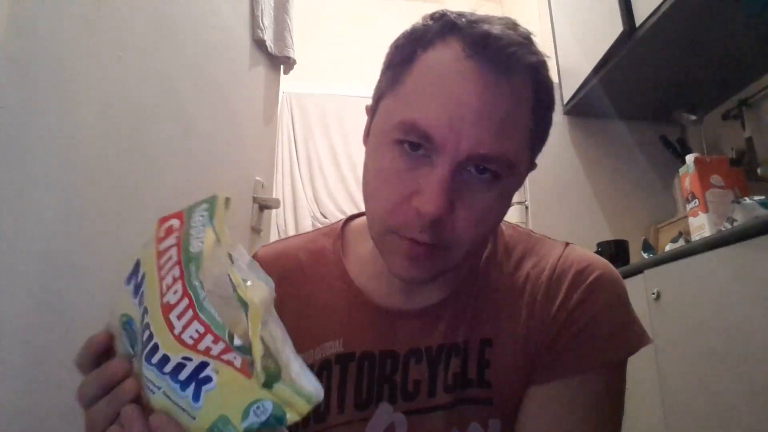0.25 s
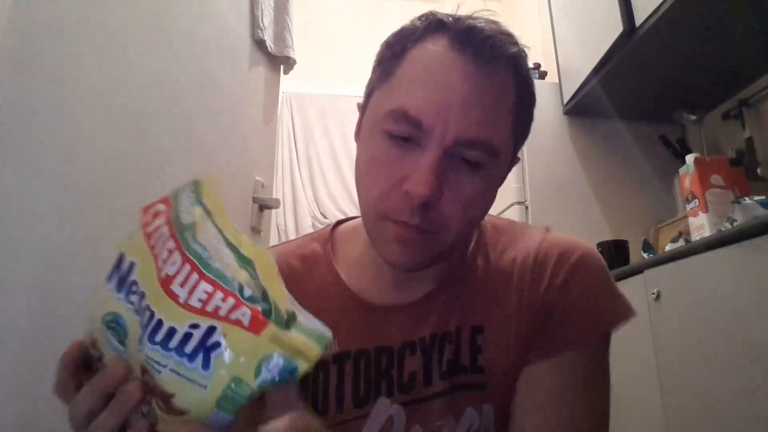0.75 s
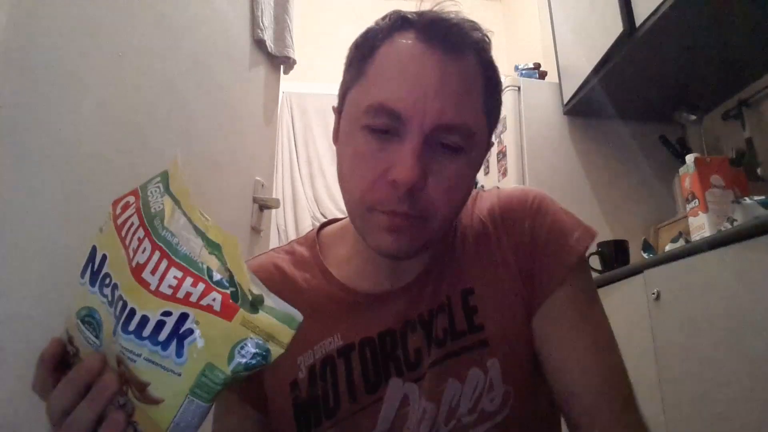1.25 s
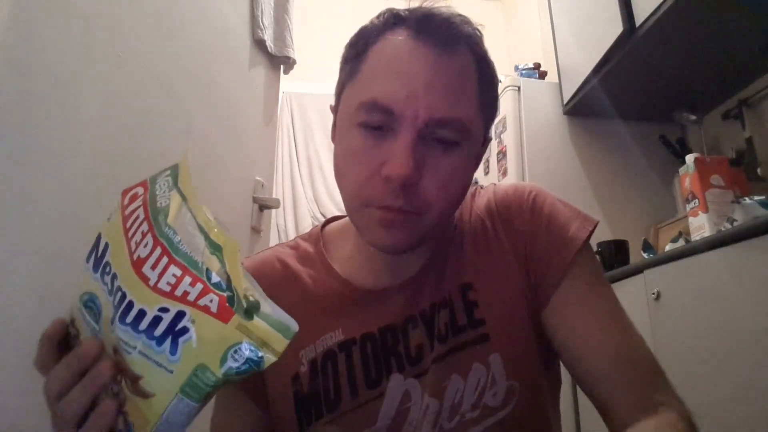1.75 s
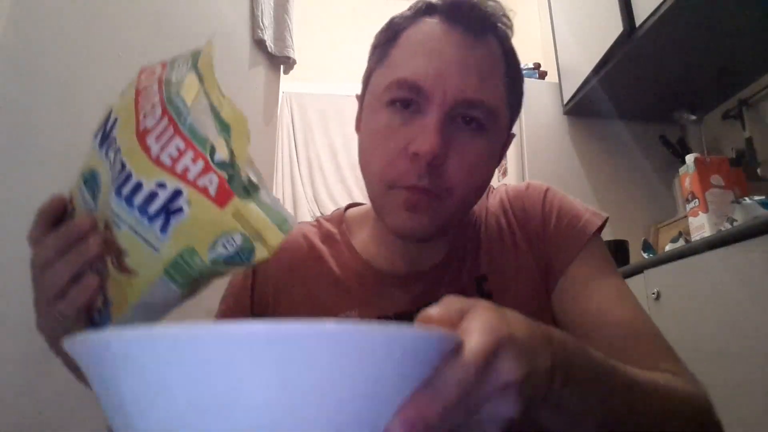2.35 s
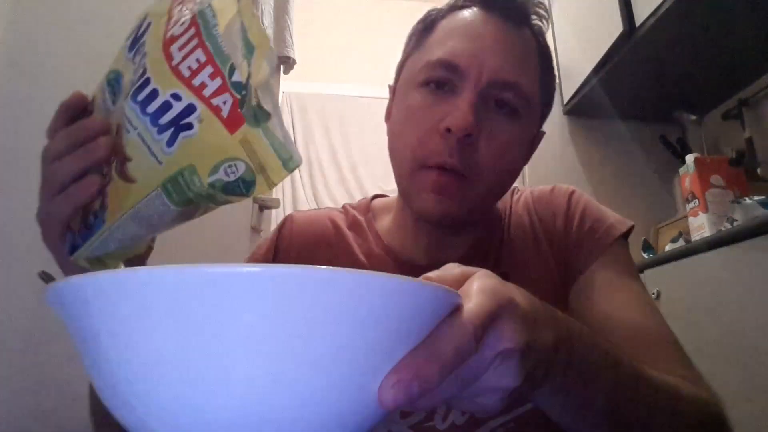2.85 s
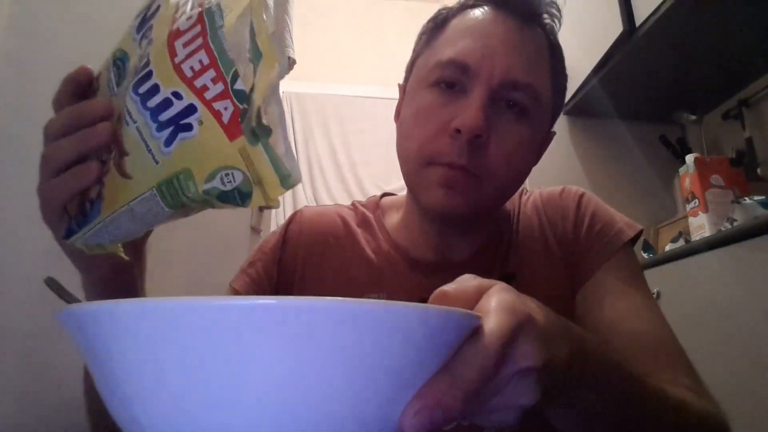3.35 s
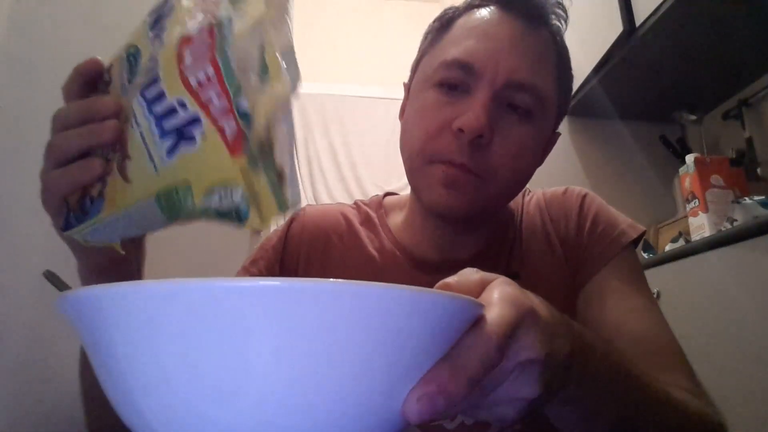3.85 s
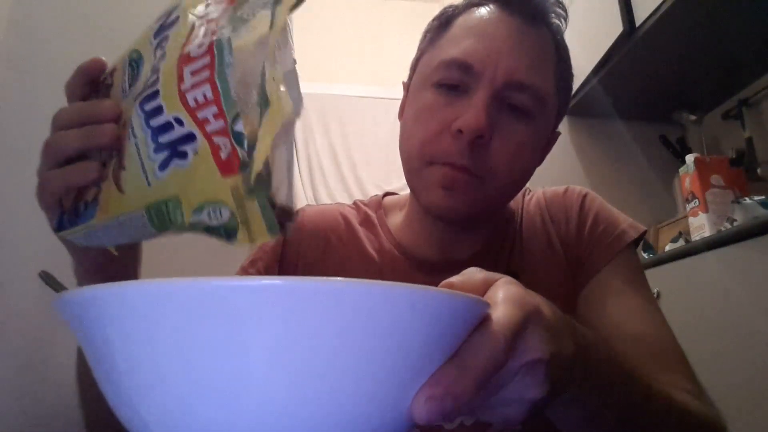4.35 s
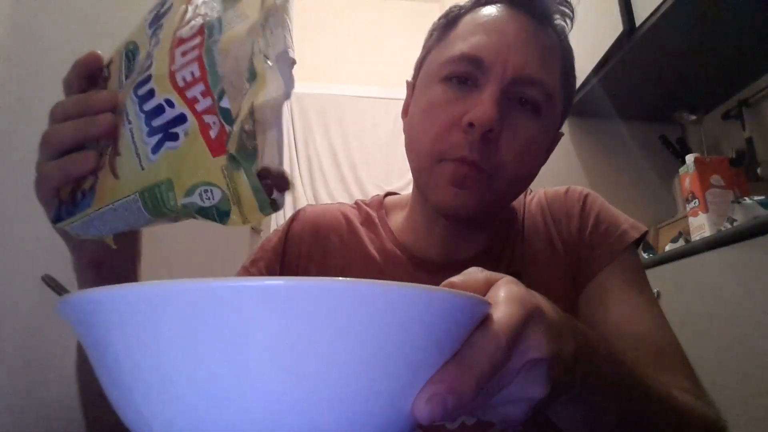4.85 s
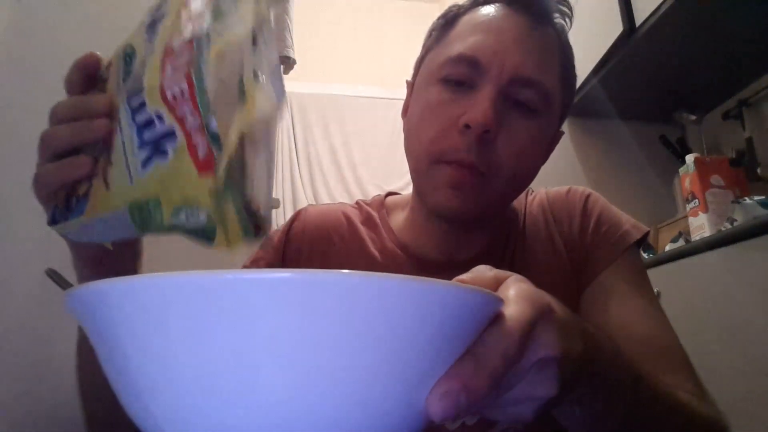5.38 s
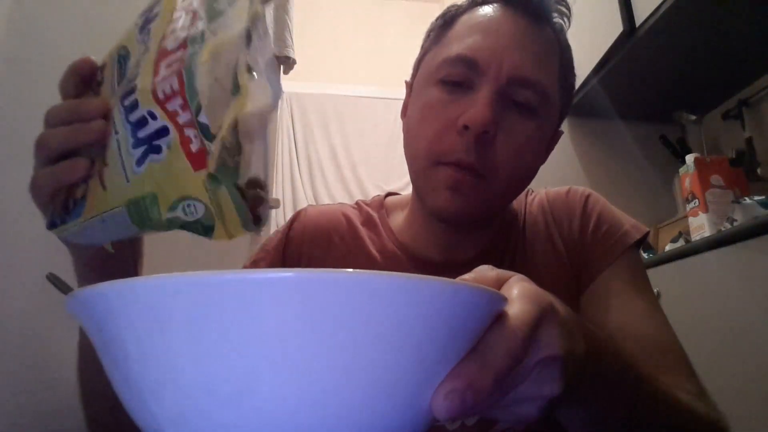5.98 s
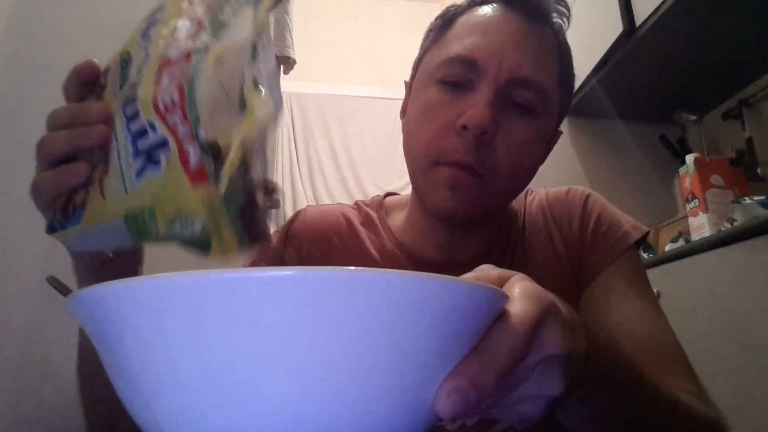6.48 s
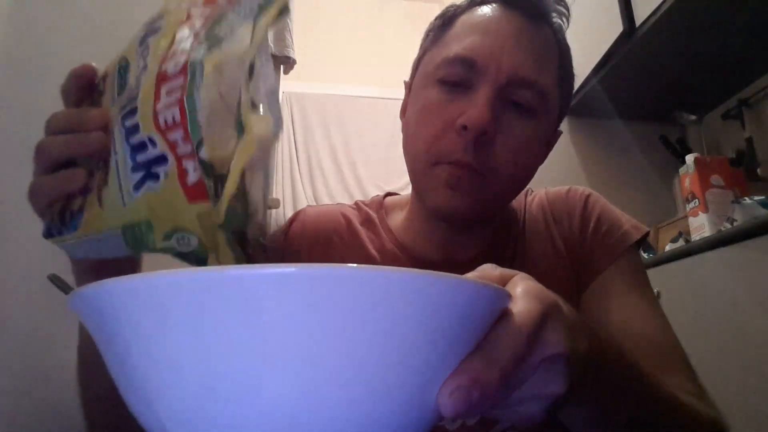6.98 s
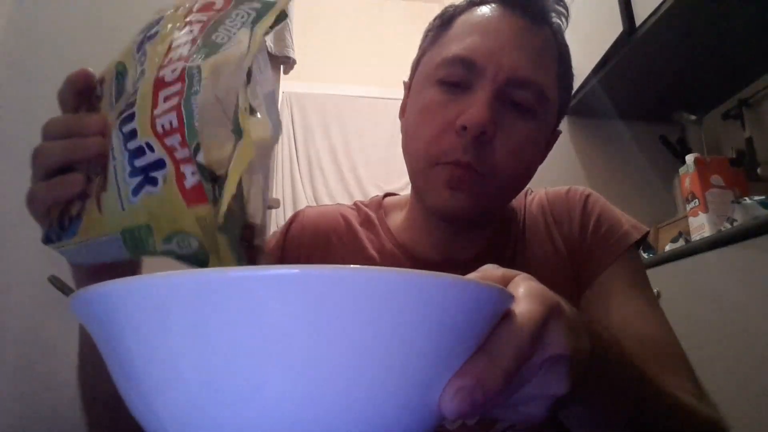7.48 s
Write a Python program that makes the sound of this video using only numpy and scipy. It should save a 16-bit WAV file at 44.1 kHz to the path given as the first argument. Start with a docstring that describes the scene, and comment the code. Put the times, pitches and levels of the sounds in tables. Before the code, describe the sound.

A plastic bag of cereal crinkles close by with sharp snaps and dry clicks. A bowl knocks and drags on a table with a short squeaky scrape, then there is near quiet. The bag is tipped and hard little balls rattle out in quick shaken surges, pinging on the bowl ever more densely. Dull running thuds boom through the wall. Small kitchen, one close microphone, faint hum.

```python
"""A plastic bag of cereal balls crinkles as it is shifted in a small kitchen: random ticks, sharp snaps, dry clicks.
A bowl then knocks, drags and slides on the table; the knocks ring the table top, the slips ring the rim.
The bag is tipped: balls roll out in shaken surges, clack together and ping on the hand-held bowl, more and more.
During the pour, dull quick thuds like someone running in another room boom through the wall.
Faint air and hum lie under it all; one close microphone hears it, the same in both channels."""
import sys
import numpy as np
from scipy import signal
from scipy.io import wavfile
from scipy.ndimage import map_coordinates

SR = 44100
rng = np.random.default_rng(int(sys.argv[2]) if len(sys.argv) > 2 else 0)


def file_out(sig):
    """Save sig as 16-bit WAV at sys.argv[1]."""
    # one column per channel
    cols = np.atleast_2d(sig).T
    # limit, then scale
    lim = np.clip(cols, -1, 1)
    pcm = np.round(lim * 32767).astype(np.int16)
    wavfile.write(sys.argv[1], SR, pcm)


N = 340404
TIME = np.arange(N) / SR

# how strongly the crinkling bag sounds at each pitch: pitch_hz, relative level_db
BAG_SPECTRUM = [(40, -49), (90, -8), (190, 0.5), (320, -10.5), (400, 6), (550, 1.5), (1000, 2),
                (1800, -5.5), (3200, -5.5), (4700, 0), (7000, -9.5), (9500, -19), (14000, -69)]
# how strongly the rolling balls sound at each pitch: pitch_hz, relative level_db
RATTLE_SPECTRUM = [(60, -23.5), (150, -4.5), (290, -3.5), (420, 3), (900, -1.5), (1700, 1), (3200, 2.5),
                   (4900, 9), (7700, 1.5), (10400, -8), (12000, -18.5), (14500, -81)]
TIPPED_S = 3.548


def bag():
    """The film crinkles in many tiny contacts while it is lifted; once tipped, the balls roll and tumble."""
    film_ticks = colour(grains(per_s=1200, spread_db=3.2, t60=0.0035), BAG_SPECTRUM)
    crinkle = rustle(handling(), film_ticks, crisp_db=0.3, body_db=-3.0)
    ball_ticks = colour(grains(per_s=1200, spread_db=3.5, t60=0.01), RATTLE_SPECTRUM)
    rattle = rustle(flow(), ball_ticks, crisp_db=2.1, body_db=-0.2)
    tipped = np.clip((TIME - TIPPED_S) / 0.035, 0, 1)
    return (1 - tipped) * crinkle + tipped * rattle


# bag lifted, held still, then tilted, before bag() trims it: time_s, crinkle_db, body_db (balls shifting inside)
HANDLING = [(0, -38.5, -41.5), (.2, -35, -40.5), (.41, -39.5, -44.5), (.46, -32.5, -32.5),
            (.55, -36, -41.5), (.72, -36, -35.5), (.88, -28.5, -28.5), (.94, -33, -32.5), (.99, -47, -58),
            (1.35, -63.5, -62), (1.6, -52, -52), (2.0, -55.5, -59), (2.35, -74.5, -66), (2.87, -75.5, -81),
            (3.0, -61, -63), (3.28, -56, -61.5), (3.55, -46.5, -53.5)]
# brief rustles, some of them film settling after a snap, before the same trim: start_s, length_s, level_db
RUSTLES = [(1.106, 0.062, -44), (1.493, 0.064, -31), (2.015, 0.22, -50.5), (2.394, 0.13, -59.5),
           (2.64, .13, -53.5), (2.913, 0.06, -52.5), (3.122, 0.088, -42.5), (3.301, 0.067, -47),
           (3.404, 0.082, -45)]


def handling(rise_s=0.016, fade_db=-17, body_db=-4.5):
    """Loudness of film and balls in the hand: slow movement plus brief rustles that swell quickly and fade."""
    crisp, body = level(HANDLING)
    brief = np.zeros(N)
    for start_s, length_s, level_db in RUSTLES:
        t = TIME[TIME < 2 * length_s]
        fading = amp(level_db + fade_db * (t / length_s) ** 2)
        add(brief, start_s, np.minimum(t / rise_s, 1) * fading)
    return np.hypot(crisp, brief), np.hypot(body, brief * amp(body_db))


# mean flow out of the bag, before the shakes and trims: time_s, rattle_db, body_db (balls rolling)
POURING = [(3.55, -45, -45.5), (3.8, -37, -41.5), (4.1, -36.5, -40.5), (4.3, -35.5, -39.5),
           (4.52, -34, -37.5), (4.85, -33, -41), (5.13, -34.5, -40), (5.24, -41, -46.5),
           (5.5, -42.5, -45.5), (5.62, -36.5, -41), (5.8, -37, -45), (6.0, -34, -41), (6.12, -33, -39),
           (6.19, -35, -41.5), (6.27, -31.5, -39.5), (6.6, -30.5, -42), (6.86, -34, -44.5),
           (7.07, -32.5, -45), (7.19, -35, -44), (7.24, -31, -43), (7.4, -29.5, -43.5),
           (7.72, -30.5, -45.5)]
# the shaking rhythm slows slightly as the shakes grow wider
FIRST_SHAKE_S, WIDER_S = 3.63, 5.8
SHAKES_PER_S, WIDE_SHAKES_PER_S = 6.56, 6.33
SWING_DB, WIDE_SWING_DB = 2.5, 3.5  # each shake swings the flow up and down by this much
HESITATE_S = 0.027  # the hand hesitates as it changes to wider shakes


def flow(widen_s=0.34):
    """Loudness of rattle and body in the pour: every shake of the bag makes the mean flow surge."""
    crisp, body = level(POURING)
    wide = np.clip((TIME - WIDER_S) / widen_s, 0, 1)
    t = TIME - wide * HESITATE_S
    shakes = SHAKES_PER_S * (np.minimum(t, WIDER_S) - FIRST_SHAKE_S)
    shakes = shakes + WIDE_SHAKES_PER_S * np.maximum(t - WIDER_S, 0)
    swing_db = SWING_DB + wide * (WIDE_SWING_DB - SWING_DB)
    surge = amp(swing_db * np.cos(2 * np.pi * shakes))
    return crisp * surge, body * surge


# sharp snaps and dry clicks, one a quick echo: start_s, crisp peak_db (before the ring),
# hollow_db (against the crisp part, before body_db), ring_hz
SNAPS = [(.1171, -19, -10, 5020), (.1833, -20, -12, 4890), (0.3745, -22, -21, 4590), (.55, -5.5, -5, 5300),
         (.6354, -13, 4, 1990), (.748, -8.5, 1.5, 5000), (.7942, -18.5, 12, 4000), (.8468, -0.5, -10, 4480),
         (.859, -9, -2, 4410), (0.8774, -6, -13, 4400), (0.8847, -7.5, -22, 4310), (.9195, -10, -3, 5080),
         (.9646, -1.5, -6, 2400), (1.13, -15.5, -4, 1480), (1.457, -25, -10, 5450), (1.488, -3.5, -6, 5600),
         (1.5015, -11, -10, 4900), (1.98, -31, -15, 2170), (2.025, -29, -14, 4070),
         (2.058, -21.5, -19, 5200), (2.133, -30, -15, 3900), (2.166, -31.5, -18, 4800),
         (2.268, -40, -3, 1920), (2.734, -39, -10, 4500), (2.781, -32, 4, 2730), (2.955, -36, -14, 4500),
         (3.094, -32, -6, 4840), (3.1216, -12, -12, 3730), (3.618, -12, -6, 3400), (3.6474, -13, -11, 1400),
         (3.737, -17, -6, 1980), (4.0878, -10, -11, 5730), (4.3204, -12.5, 5, 4090), (4.4009, -6, -7, 3550),
         (4.807, -9.5, -18, 4290), (4.861, -12, -3, 4010), (4.957, -9, -9, 4950), (4.999, -9, -20, 4610)]
# how strongly a crack sounds at each pitch: pitch_hz, relative level_db
SNAP_SPECTRUM = [(100, -16.5), (450, 4.5), (1500, 3.5), (3000, 5.5), (5200, 11.5), (7500, -3.5),
                 (10000, -14.5), (14500, -47)]


def snaps(body_db=3, split_hz=1500, flutter_s=0.01, ring_db=-7, ring_cycles=12):
    """Each snap or click is a push with a short flutter that rings at its own pitch, over a hollow pop."""
    out, t = np.zeros(N), TIME[:SR // 20]
    for start_s, peak_db, hollow_db, ring_hz in SNAPS:
        crack = colour(burst(t, flutter_s, grit=0.28), SNAP_SPECTRUM)
        crisp = band(crack, split_hz, "high")
        body = band(crack, split_hz, "low")
        resonance = np.sin(2 * np.pi * ring_hz * t) * dying(t, ring_cycles / ring_hz)
        ring = signal.oaconvolve(crack, resonance)[:len(t)]
        top = abs(crisp).max()
        ringing = crisp + amp(ring_db) * crisp.std() * evened(ring)
        crisp = ringing / np.hypot(1, amp(ring_db))  # the ring colours the snap but adds little power
        add(out, start_s, amp(peak_db) * (crisp + amp(hollow_db + body_db) * body) / top)
    return out


# the load slumping inside the bag with a hollow rush: start_s, length_s, level_db
SLUMPS = [(3.925, 0.021, -36), (4.508, 0.067, -35), (4.849, 0.027, -30.5), (5.255, 0.032, -36),
          (6.217, 0.067, -30.5), (6.373, 0.064, -35.5)]


def slumps(rise_s=0.0077, fade_db=-9, low_hz=330, high_hz=1150):
    """Many balls shift at once and drum on the inside of the bag."""
    gain = np.zeros(N)
    for start_s, length_s, level_db in SLUMPS:
        t = TIME[TIME < 2 * length_s]
        fading = amp(level_db + fade_db * (t / length_s) ** 2)
        add(gain, start_s, np.minimum(t / rise_s, 1) * fading)
    drumming = colour(grains(per_s=1500, spread_db=2.5, t60=0.013), BAG_SPECTRUM)
    return gain * evened(band(band(drumming, low_hz, "high"), high_hz, "low"))


def clacks(per_s=170, level_db=-2.0, low_hz=2400, high_hz=8000, cycles=12, count=28):
    """Dry balls clack against each other at many pitches, each gone in a few cycles."""
    t = TIME[:SR // 50]
    ticks = np.zeros(N)
    for hz in np.linspace(low_hz, high_hz, count):
        clack = np.sin(2 * np.pi * hz * t) * dying(t, cycles / hz)
        ticks += signal.oaconvolve(clicks(per_s / count, spread_db=2.3), clack)[:N]
    rattle, _ = flow()
    return evened(band(ticks, 9000, "low")) * rattle * amp(level_db) * (TIME > TIPPED_S)


# hardest balls hitting the bowl: start_s, ring_db (before level_db), spot_hz (pitch favoured by the spot struck),
# low_db (low modes against the ring), high_db (high modes against the ring)
STRIKES = [(4.477, -14.5, 4880, -14, -20), (4.5706, -14.5, 4950, -14, -6), (4.6044, -15, 4770, -1.5, -10.5),
           (4.785, -24, 4630, -2, -6), (4.859, -20, 4150, -1.5, -11), (4.893, -12, 4500, -6, -3),
           (4.9273, -15.5, 4770, -11, -7.5), (5.0305, -23, 4550, 3, -10), (5.071, -16.5, 4520, -6, -8),
           (5.2508, -26.5, 4670, 5.5, -1), (5.308, -15.5, 4440, -14, -3.5), (5.661, -11.5, 4720, -10, -9),
           (5.759, -9, 4760, -12.5, -17.5), (5.88, -18, 4430, -6.5, -4.5), (6.0116, -14, 4750, -8, -17),
           (6.119, -17, 4450, -4, -9), (6.1602, -14.5, 4820, -11, -11), (6.2247, -19, 4470, -8, -10),
           (6.2856, -13.5, 4520, -10, -15), (6.328, -7.5, 4760, -24, -12), (6.337, -13, 4700, -15, -13),
           (6.4708, -6.5, 4780, -14, -6), (6.507, -19, 4550, -10, -9), (6.527, -18, 4640, -16, -6),
           (6.56, -21, 4590, -5, -4), (6.5766, -20, 4540, -6, -7), (6.589, -16, 4690, -6, -18),
           (6.604, -14.5, 4780, -12, -12), (6.611, -16.5, 4820, -10, -10), (6.6863, -22.5, 4630, -14, -13),
           (6.7068, -18.5, 4650, -10, -7), (6.718, -18.5, 4500, -9, -9), (6.752, -21.5, 4730, -7, -1),
           (6.768, -21.5, 4520, 3, -3), (6.7756, -12.5, 4700, -8, -6), (6.9233, -13, 4780, -12, -5.5),
           (6.937, -14.5, 4820, -10, -12), (7.0978, -20, 4840, -7, -13), (7.2207, -13.5, 4870, -12, -18),
           (7.263, -22, 4450, -14, -8), (7.2785, -14, 4860, -11, -6), (7.3762, -14, 4770, -11, -9),
           (7.394, -16, 4900, -9, -7), (7.422, -18, 4700, -7, -4), (7.4526, -13.5, 5020, -8.5, -9),
           (7.5089, -19, 4920, -15, -18), (7.5315, -21, 4500, -12, -13), (7.5433, -11.5, 4800, -13, -16),
           (7.5647, -20, 4770, 3.5, 2), (7.586, -15, 4630, -9, -13), (7.628, -16, 4400, -8, -10),
           (7.6945, -12, 4780, -9, -4)]


def strikes(level_db=-3.5, bounce_db=-15):
    """Balls drop into the bowl, and each hops once more onto another spot."""
    out = np.zeros(N)
    for start_s, ring_db, spot_hz, low_db, high_db in STRIKES:
        gain = amp(ring_db + level_db)
        add(out, start_s, gain * ping(spot_hz, low_db, high_db))
        hop_s = start_s + rng.uniform(.008, .025)
        add(out, hop_s, gain * amp(bounce_db) * ping(rng.uniform(4300, 5100), low_db, high_db))
    return out


# modes (natural ringing pitches) of the held bowl, before chance: pitch_hz, relative level_db, t60_s (60 dB fade)
BOWL = [(2216, -4, 0.016), (2646, 8, .022), (2895, 4, .025), (3525, 3.5, .022), (4050, 2, .035),
        (4300, 1.5, .02), (4458, 10, 0.044), (4680, 3.5, .022), (4788, 10, .035), (4975, 6, .028),
        (5110, 3, .02), (5739, -4, .018), (6295, 1, .04), (7570, -0.5, 0.034), (8030, 2, 0.039),
        (8340, -2, 0.021)]


def ping(spot_hz, low_db, high_db, tick_db=-10, reach_hz=200, detune=0.003, buzz_s=0.0028, rise_s=0.0005):
    """A ball buzzes on the bowl; the spot struck decides which modes ring, and the load soon damps them."""
    t = TIME[:SR // 10]
    hz, mode_db, t60 = np.transpose(BOWL)
    low, high = hz < 4180, hz > 5400
    main = ~(low | high)
    chance, shift, phase = rng.standard_normal((3, len(hz)))
    chance_db = chance * np.where(main, 2.5, 5)
    weight = amp(mode_db + chance_db) / (1 + main * ((hz - spot_hz) / reach_hz) ** 2)
    # the loose load of balls pulls each mode a little off pitch
    turns = (hz * (1 + shift * detune))[:, None] * t + phase[:, None]
    # the modes hold their level through the buzz, then fade
    fading = dying(np.maximum(t - buzz_s, 0), t60[:, None])
    modes = weight[:, None] * np.sin(2 * np.pi * turns) * fading
    tick = colour(burst(t, t60=.025, grit=.8), SNAP_SPECTRUM)
    parts = [(0, modes[main].sum(0)), (low_db, modes[low].sum(0)), (high_db, modes[high].sum(0)), (tick_db, tick)]
    onset = 1 - np.exp(-t / rise_s)
    return sum(amp(db) * struck(part * onset, first_s=.007) for db, part in parts)


# share of the flow that hits the bowl's wall, before level_db: time_s, level_db
ON_WALL = [(4.3, -30), (4.9, -9), (5.8, -10), (6.4, 5.5)]


def jostle(per_s=130, level_db=-9, count=24):
    """As the bowl fills, more balls skitter against its wall in step with the flow."""
    share_db = np.interp(TIME, *np.transpose(ON_WALL))
    pings = np.zeros(N)
    for _ in range(count):
        contacts = clicks(per_s / count, spread_db=2.5)
        low_db = -8.5 + 4.5 * rng.standard_normal()
        sound = ping(rng.uniform(4000, 5200), low_db, high_db=-8, tick_db=-8.5)
        pings += signal.oaconvolve(contacts, sound)[:N]
    rattle, _ = flow()
    return evened(pings) * rattle * amp(share_db + level_db)


# bowl bumping the table: start_s, thump_db (low modes), hollow_db (upper modes)
KNOCKS = [(1.431, -34, -44), (1.451, -36, -37), (1.572, -32, -29.5), (1.656, -20.5, -26.5),
          (1.675, -24.5, -24.5), (1.71, -32, -35.5), (1.763, -29, -38.5), (1.867, -24, -37.5),
          (2.03, -49, -53)]
# modes of the table top, before each spot retunes them: pitch_hz, relative level_db, t60_s
TABLE = [(126, -1.5, .085), (172.4, 0, .095), (245, 0, .08), (333, -4, .085), (410, 1, 0.047),
         (499, -0.5, .06), (588, -0.5, 0.053), (760, -11, 0.025), (990, -7, 0.039), (1175, -12, 0.027),
         (1523, -15, .029)]


def knocks(detune=0.06, chatter_s=0.032, grit=0.057):
    """Bumps ring the table; the bowl's foot chatters as it lands, its weight retuning the table at every spot."""
    out, t = np.zeros(N), TIME[:SR // 4]
    hz, mode_db, t60 = np.transpose(TABLE)[:, :, None]
    low = hz[:, 0] < 350
    for start_s, thump_db, hollow_db in KNOCKS:
        turns = hz * (1 + detune * rng.uniform(-1, 1, hz.shape)) * t
        signs = rng.choice([-1, 1], hz.shape)
        modes = amp(mode_db) * signs * np.sin(2 * np.pi * turns) * dying(t, t60)
        blow = burst(t, chatter_s, grit)
        for db, group in (thump_db, low), (hollow_db, ~low):
            ringing = signal.oaconvolve(blow, modes[group].sum(0))
            add(out, start_s, amp(db) * struck(ringing, first_s=.02))
    return out


def drag(start_s=1.425, end_s=1.8, level_db=-40.0, low_hz=100, high_hz=480, edge_s=0.02):
    """Between the bumps the bowl judders over the table top in a run of small low contacts."""
    judder = band(band(grains(per_s=300, spread_db=3, t60=0.014), low_hz, "high"), high_hz, "low")
    edges = np.clip(np.minimum(TIME - start_s, end_s - TIME) / edge_s, 0, 1)
    return amp(level_db) * evened(judder) * edges


# bowl sliding over the table and brushing the hand: start_s, length_s, level_db, squeak_hz (rim's lowest resonance)
SLIDE = [(1.761, .036, -50, 2250), (1.847, .045, -41.5, 2230), (1.893, .085, -42.5, 2130),
         (2.1, 0.048, -48.5, 2250), (2.181, 0.038, -50, 2450)]
# the rim as it scrapes; each stroke's squeak replaces the first pitch: pitch_hz, width_hz, relative level_db
RIM = [(2130, 100, 8), (2440, 120, 6), (2840, 120, 4.5), (3400, 120, 6.5), (4950, 120, 4), (6180, 110, 6),
       (6660, 90, 1)]


def slide(wander=0.012, wander_hz=11, edge_s=0.0089):
    """Tiny slips of the bowl's foot ring its rim; each stroke's own squeak wavers with the pressure."""
    out, t = np.zeros(N), TIME[:SR // 20]
    hz, width, mode_db = np.transpose(RIM)[:, :, None]
    for start_s, length_s, level_db, squeak_hz in SLIDE:
        pitches = np.vstack([[squeak_hz], hz[1:]])
        fading = np.sqrt(width) * np.exp(-np.pi * width * t)
        rim = amp(mode_db) * fading * np.cos(2 * np.pi * pitches * t)
        slips = signal.oaconvolve(clicks(per_s=1100, spread_db=5.0)[:SR], rim.sum(0))
        slips = band(band(slips, 1200, "high"), 7100, "low")
        u = TIME[TIME < length_s]
        # reading the slips at an uneven speed bends their pitch
        bend = np.cumsum(wander * np.sin(2 * np.pi * (wander_hz * u + rng.random()))) / SR
        stroke = evened(map_coordinates(slips, [(u + bend) * SR]))
        edges = np.minimum(np.minimum(u, length_s - u) / edge_s, 1)
        add(out, start_s, amp(level_db) * stroke * edges)
    return out


# far footfalls, before level_db: start_s, peak_db
STEPS = [(3.905, -31), (4.19, -24), (4.428, -25.5), (4.66, -25), (4.89, -27), (5.085, -23.5),
         (5.319, -26.5), (5.551, -28), (5.788, -25), (6.022, -27), (6.24, -27)]
# floor and walls booming, before chance and detuning: pitch_hz, relative level_db, t60_s
BOOM = [(61.8, -6, 0.36), (82.8, 1.5, 0.63), (121, -1, 0.19), (135.1, -13, 1), (178.8, -5, 0.91)]


def steps(level_db=-3.0, swell_s=0.032, detune=0.039, rumble_db=-3):
    """Each far footfall swells slowly in the low modes of the building and leaves a diffuse rumble."""
    out, t = np.zeros(N), TIME[:SR // 2]
    for start_s, peak_db in STEPS:
        boom = np.zeros(len(t))
        for hz, mode_db, t60 in BOOM:
            gain = amp(mode_db + 1.5 * rng.standard_normal())
            turns = hz * (1 + detune * rng.uniform(-0.97, 1)) * t + rng.random()
            boom += gain * np.sin(2 * np.pi * turns) * dying(t, t60)
        rumble = band(band(rng.standard_normal(len(t)), 60, "high"), 220, "low")
        rumble = rumble * dying(t, t60=0.75)
        thud = evened(boom) + amp(rumble_db) * evened(rumble)
        swell = 1 - np.exp(-(t / swell_s) ** 2)
        add(out, start_s, amp(peak_db + level_db) * peaked(thud * swell))
    return out


# steady hum: pitch_hz, rms level_db
HUM = [(49, -70.5), (97, -70.5), (194, -67.5), (441, -77.5)]
# how strongly the room air sounds at each pitch: pitch_hz, relative level_db
AIR_SPECTRUM = [(25, -1), (60, 1), (200, -2), (600, -9), (2000, -16), (6000, -20), (10000, -33),
                (14000, -50)]


def background(air_db=-65):
    """Faint room air is coloured noise; the hum is a few steady tones."""
    hum = np.zeros(N)
    for hz, db in HUM:
        hum += np.sqrt(2) * amp(db) * np.sin(2 * np.pi * (hz * TIME + rng.random()))
    return hum + amp(air_db) * evened(colour(rng.standard_normal(N), AIR_SPECTRUM))


def kitchen(x, tail_db, count=6, turn_s=.012):
    """Contacts happen all over bag and bowl, so they take turns among several echo paths."""
    out = x
    for k in range(count):
        away = (TIME / turn_s - k + 1) % count - 1
        share = np.cos(np.pi / 2 * np.minimum(abs(away), 1))
        out = out + signal.oaconvolve(x * share, reflections(tail_db))[:N]
    return out


# kitchen decay: pitch_hz, t60_s
ROOM = [(150, 0.3), (530, 0.13), (1400, 0.11), (3700, 0.12), (9700, 0.12)]
# first reflections from table, wall and ceiling, before they stray: delay_s, gain (plain factor)
ECHOES = [(.0016, 0.3), (.0034, 0.2), (.0062, 0.09), (0.0129, 0.15), (0.0151, 0.084)]


def reflections(tail_db, build_s=0.0052, stray=0.16):
    """The kitchen as heard from one spot: a few hard reflections and a short diffuse tail."""
    hz, t, z = signal.stft(rng.standard_normal(SR // 2), SR, nperseg=256)
    tail = signal.istft(z * dying(t, read(ROOM, hz)[:, None]), SR)[1]
    tail = tail * (1 - np.exp(-(TIME[:len(tail)] / build_s) ** 2))
    response = amp(tail_db) * tail / np.linalg.norm(tail)
    for delay_s, gain in ECHOES:
        add(response, delay_s * (1 + stray * rng.uniform(-1, 1)), np.array([gain]))
    return response


# the deep bass late in the pour: time_s, level_db
BASS_FALL = [(6.35, 0), (6.65, -11), (7.0, -26), (7.72, -9)]


def thinned(x, split_hz=90):
    """The deep bass falls away late in the pour, then partly returns."""
    bass_gain = amp(np.interp(TIME, *np.transpose(BASS_FALL)))
    return band(x, split_hz, "high") + band(x, split_hz, "low") * bass_gain


def rustle(gains, ticks, crisp_db, body_db, split_hz=1500):
    """The same contacts sound crisp in the film and hollow in the mass of balls."""
    crisp, body = gains
    high = evened(band(ticks, split_hz, "high"))
    low = evened(band(ticks, split_hz, "low"))
    return amp(crisp_db) * crisp * high + amp(body_db) * body * low


def grains(per_s, spread_db, t60):
    """Every contact releases its own tiny noise burst, so no two ticks have the same colour."""
    power = signal.lfilter([1], [1, -dying(1 / SR, t60) ** 2], clicks(per_s, spread_db) ** 2)
    return np.sqrt(power) * rng.standard_normal(N)


def clicks(per_s, spread_db, limit=4.66):
    """Random contacts, most small and a few large."""
    size = amp(spread_db * np.minimum(rng.exponential(1, N), limit))
    return size * rng.choice([-1, 1], N) * (rng.random(N) < per_s / SR)


def burst(t, t60, grit):
    """A push followed by a short scatter of smaller contacts."""
    return (t == 0) + grit * rng.standard_normal(len(t)) * dying(t, t60)


def dying(t, t60):
    """A fade that drops 60 dB in t60 seconds."""
    return np.exp(-np.log(1000) * t / t60)


def colour(x, spectrum, size=4096):
    """Filters a sound to the given spectrum, with no sound ahead of its cause."""
    hz = abs(np.fft.fftfreq(size, 1 / SR))
    log_gain = np.log(amp(read(spectrum, hz)))
    taps = np.fft.ifft(np.exp(np.conj(signal.hilbert(log_gain)))).real
    return signal.oaconvolve(x, taps[:size // 2])[:len(x)]


def band(x, hz, kind):
    """Steep crossover half: the low and high halves sum to a flat response."""
    sos = signal.butter(2, hz, kind, fs=SR, output="sos")
    return signal.sosfilt(np.vstack([sos, sos]), x)


def read(points, hz):
    """A curve joined by straight lines over log frequency."""
    f, value = np.transpose(points)
    return np.interp(np.log(hz + 1), np.log(f + 1), value)


def level(curve):
    """Crisp and body gains along a level curve."""
    s, crisp_db, body_db = np.transpose(curve)
    return amp(np.interp(TIME, s, crisp_db)), amp(np.interp(TIME, s, body_db))


def amp(db):
    """Decibels to a plain factor."""
    return 10 ** (np.asarray(db) / 20)


def evened(x):
    """Scales a sound to rms 1."""
    return x / np.sqrt(np.mean(x ** 2) + 1e-20)


def peaked(x):
    """Scales a sound to peak 1."""
    return x / (abs(x).max() + 1e-20)


def struck(x, first_s):
    """Scales a hit to rms 1 over its first moments."""
    return x / np.sqrt(np.mean(x[:round(first_s * SR)] ** 2) + 1e-20)


def add(mix, s, sound):
    """Lays a sound into the mix from time s, in seconds."""
    part = mix[max(round(s * SR), 0):][:len(sound)]
    part += sound[:len(part)]


def scene():
    """Bag and bowl sound in the kitchen; bumps come mostly through the table, steps through the wall."""
    from_bag = kitchen(bag() + slumps() + snaps() + slide(), tail_db=-2.5)
    from_bowl = kitchen(strikes() + jostle() + clacks(), tail_db=-8.0)  # the bowl is closest to the microphone
    bumps = band(knocks() + drag(), 72, "high")
    bumps = bumps + amp(-13.5) * signal.oaconvolve(bumps, reflections(tail_db=-1.5))[:N]
    mono = thinned(from_bag + from_bowl + background()) + bumps + steps()
    return np.array([mono, mono])


def record(dry):
    """The microphone sheds the deepest bass and rounds the tallest peaks; then the top treble is cut."""
    sound = band(dry, 28, "high")
    sound = sound / (1 + sound ** 6) ** (1 / 6)
    treble_cut = signal.firwin(511, 14800, window=("kaiser", 9), fs=SR)
    return signal.oaconvolve(sound, treble_cut[None], "same")


dry = scene()
out = record(dry)
file_out(out)
```